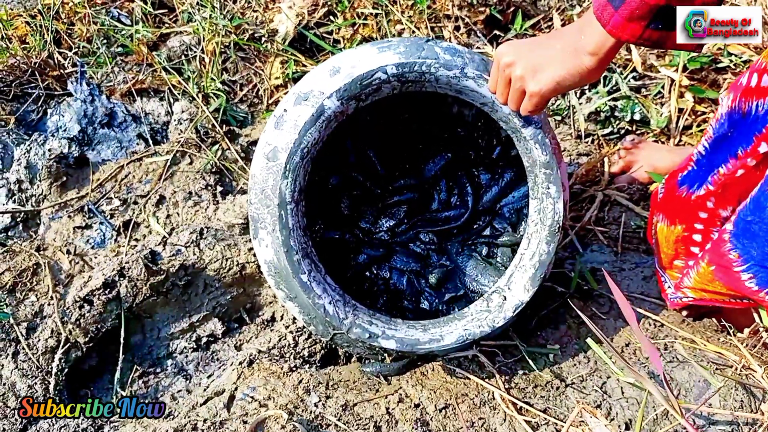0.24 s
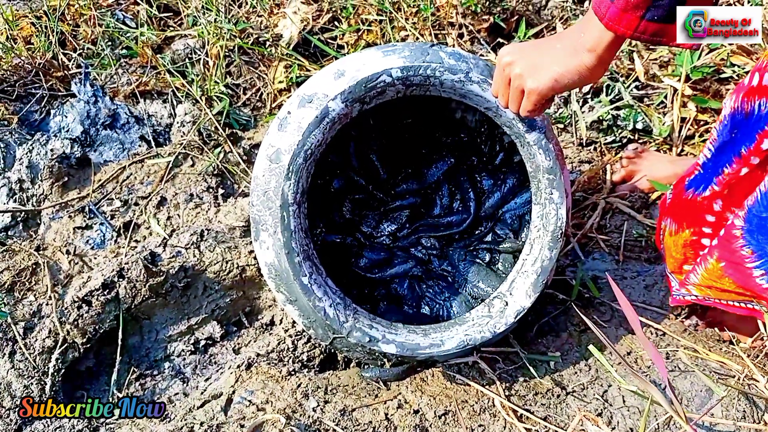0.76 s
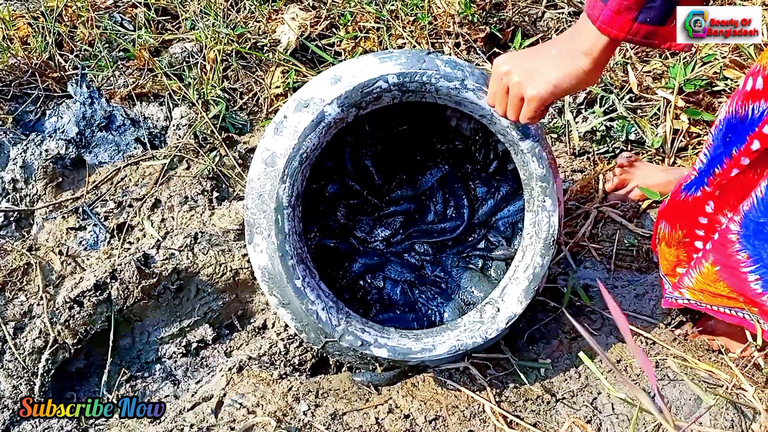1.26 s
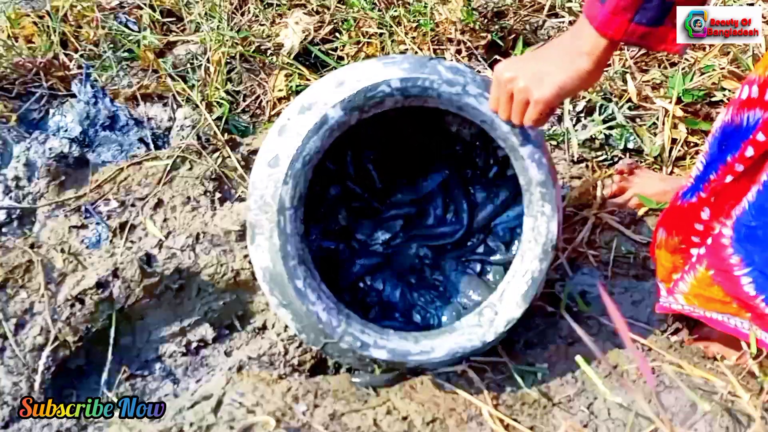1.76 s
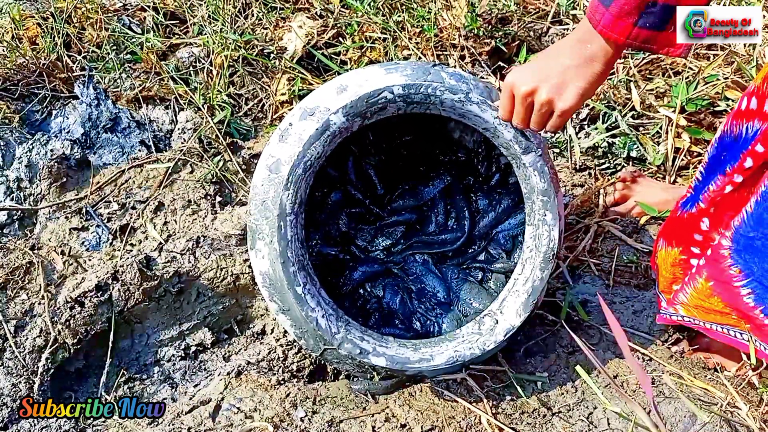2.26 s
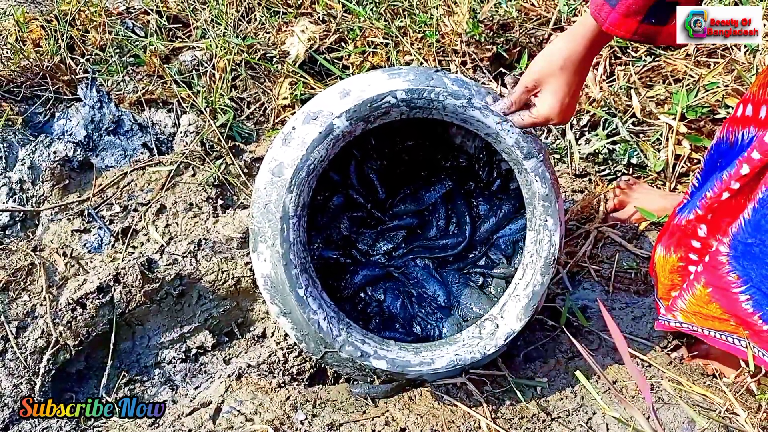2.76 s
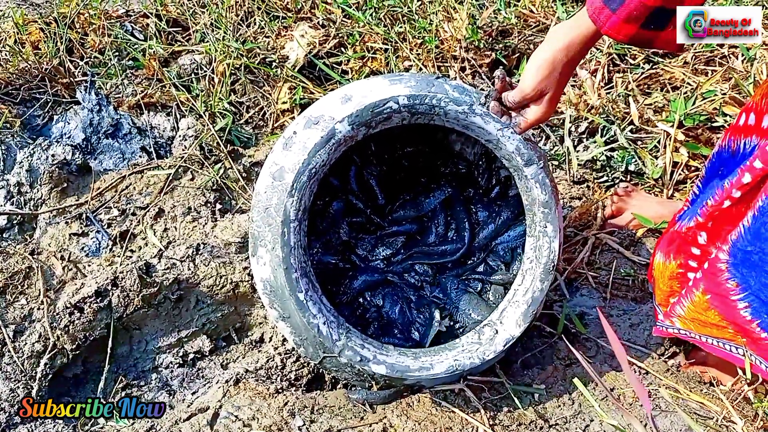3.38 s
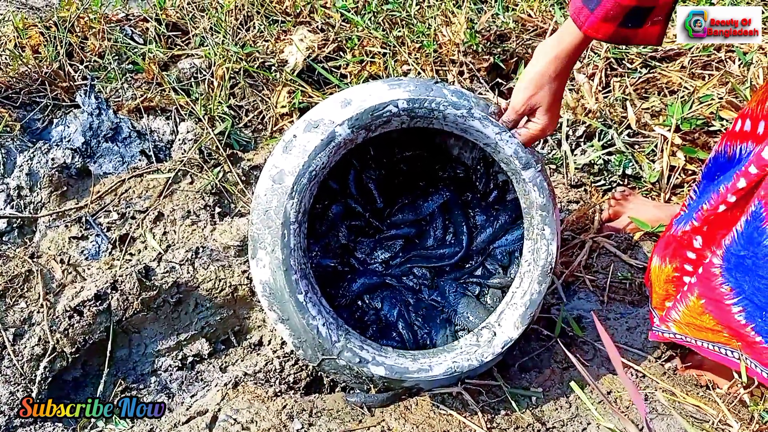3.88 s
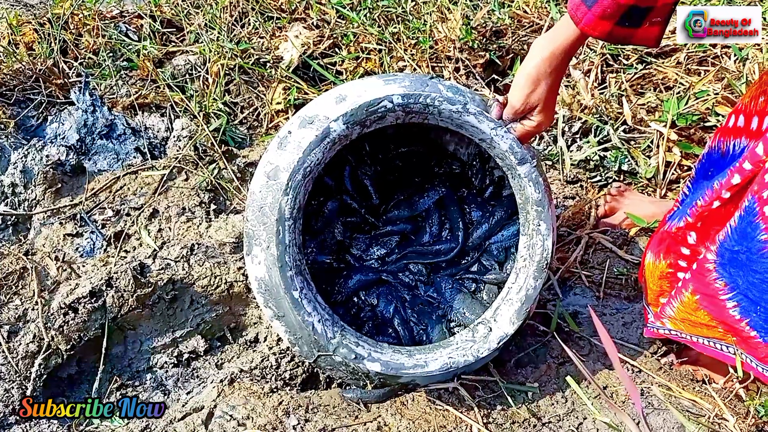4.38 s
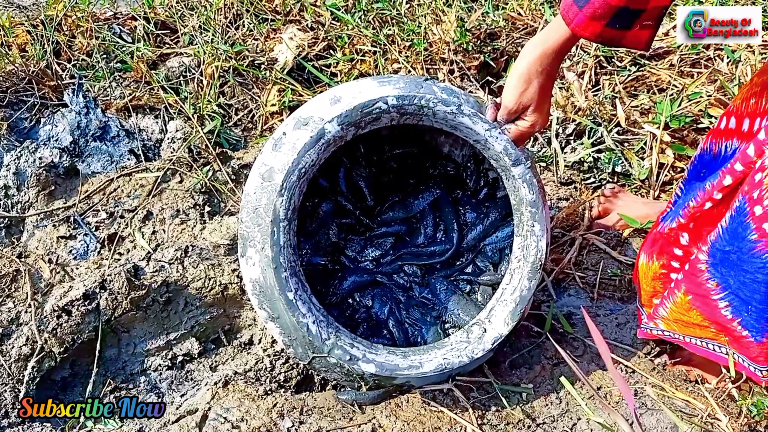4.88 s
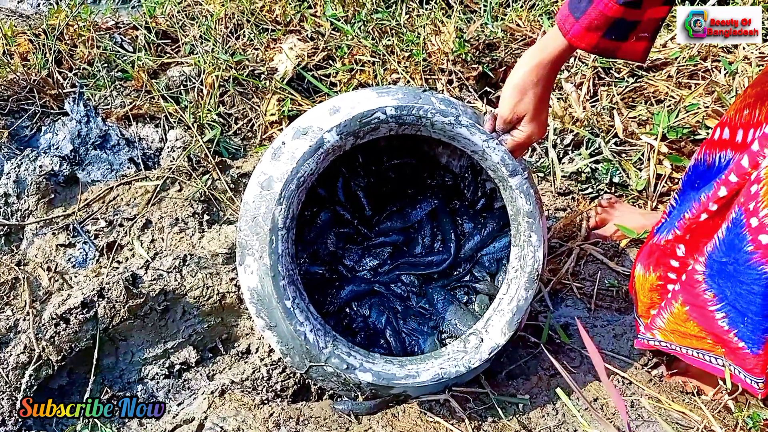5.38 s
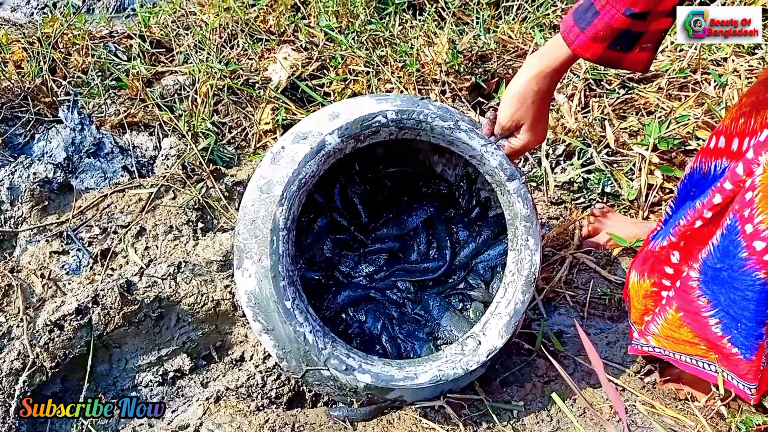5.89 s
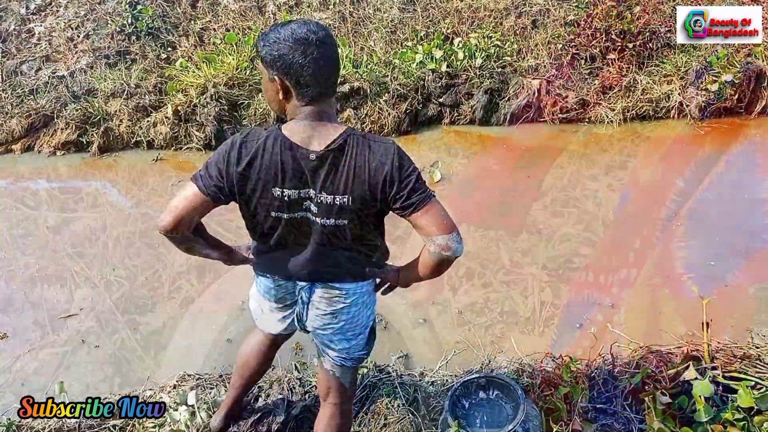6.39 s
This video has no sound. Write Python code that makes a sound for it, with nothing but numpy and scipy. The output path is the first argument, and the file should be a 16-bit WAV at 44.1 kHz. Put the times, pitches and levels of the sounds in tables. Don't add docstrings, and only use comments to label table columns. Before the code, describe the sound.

A single-cylinder engine thuds rapidly and evenly outdoors, steadily swelling closer, with small fish splashes early, belt puffs later, then a quick fade.

```python
import sys
import numpy as np
from scipy import signal
from scipy.fft import rfft, irfft, next_fast_len
from scipy.io import wavfile
from scipy.ndimage import uniform_filter1d, map_coordinates

SR = 44100
rng = np.random.default_rng(int(sys.argv[2]) if len(sys.argv) > 2 else 0)


def how_loud(loudness_db):
    steps = np.asarray(loudness_db, float) / 20
    return 10 ** steps


def transcribe(signal):
    frames = np.atleast_2d(signal).T
    limited = np.clip(frames, -1, 1)
    pcm = np.round(limited * 32767).astype(np.int16)
    wavfile.write(sys.argv[1], SR, pcm)


N = 292956

# time of an exhaust blast in seconds, firing number, valve lag in ms.
SHAFT = [(0.0542, 0, 22.0), (0.6122, 6, 22.6), (0.8887, 9, 22.5), (1.1603, 12, 22.1), (1.7044, 18, 20.8),
         (1.9894, 21, 23.2), (2.2789, 24, 23.6), (2.8538, 30, 23.4), (3.1373, 33, 23.1), (3.6987, 39, 22.9),
         (3.9749, 42, 22.5), (4.2476, 45, 22.1), (4.5252, 48, 22.8), (4.8078, 51, 23.7), (5.9449, 63, 25.6),
         (6.2261, 66, 25.7), (6.5035, 69, 25.9)]
# time in seconds, nearness in dB, engine load on the blast in dB,
# where the pipe mouth points (-1 away from the camera to 1 toward it).
APPROACH = [(0, 0.3, -0.5, -0.05), (.4, 0, 0, 0.37), (.9, 4, -4, 0.48), (1.3, 2.5, -0.5, 0.98),
            (1.7, 2, -4.5, -0.2), (2.1, 3, -3, -1.3), (2.5, 4.5, -1.7, -0.6), (2.9, 5.5, 1.5, -0.14),
            (3.4, 7.5, -0.3, 0.056), (3.9, 10, 1.6, 0.6), (4.2, 11, -1, 0.012), (4.7, 12.5, -1.4, -0.12),
            (5.1, 13.5, -3, -0.38), (5.5, 15, -1.8, 0.25), (5.8, 15, -1.9, 0.73), (6.05, 13.5, -2.5, 0.95),
            (6.3, 12.5, -2, 0.96)]


def unit(x):
    return x / np.sqrt(np.mean(x ** 2) + 1e-20)


def along(points, hz):
    f, v = np.transpose(points)
    return np.interp(np.log(hz + 1), np.log(f + 1), v)


def curves(rows, t):
    s, *cols = np.transpose(rows)
    return [np.interp(t, s, c) for c in cols]


def wobble(rate):
    knots = rng.standard_normal(int(N * rate / SR) + 4)
    return map_coordinates(knots, [np.arange(N) * rate / SR])


def past(t, start_s, db_per_s):
    return db_per_s * np.maximum(t - start_s, 0)


def filtered(x, response):
    m = next_fast_len(N + SR // 2)
    return irfft(rfft(x, m) * response(np.fft.rfftfreq(m, 1 / SR)), m)[..., :N]


def modes(table, soft_hz):
    def response(f):
        ring = sum(how_loud(db) * 1j * f * 50 / (c * c - f * f + 1j * f * w) for c, w, db in table)
        return ring * np.exp(-(f / soft_hz) ** 2)
    return response


def hiss(spectrum, lumps=1, patchy_db=2.0):
    # frequency in Hz, likeness of the left and right noise from 0 to 1.
    likeness = [(60, .98), (300, .95), (700, .8), (1400, .62), (3000, .55), (6000, .33), (15000, .2)]
    z = signal.stft(lumps * rng.standard_normal((2, N)), nperseg=512)[2]
    blotches = uniform_filter1d(rng.standard_normal(z.shape[1:]), size=3, axis=0)
    blotches = uniform_filter1d(blotches, size=4, axis=1)
    own, right = signal.istft(z * how_loud(patchy_db * unit(blotches)), nperseg=512)[1][:, :N]
    left = filtered(right, lambda hz: along(likeness, hz))
    left = left + filtered(own, lambda hz: np.sqrt(1 - along(likeness, hz) ** 2))
    return unit(filtered(np.array([left, right]), lambda hz: how_loud(along(spectrum, hz))))


def blows(s, db):
    at = np.round(s * SR).astype(int)
    return np.bincount(at[at < N], how_loud(db)[at < N], N)


def firing_count(t):
    s, number, _ = np.transpose(SHAFT)
    times = np.r_[2 * s[0] - s[1], s, 2 * s[-1] - s[-2]]
    numbers = np.r_[-number[1], number, 2 * number[-1] - number[-2]]
    return np.interp(t, times, numbers)


def rustle():
    # frequency in Hz, level in dB per Hz.
    leaves = [(7000, -64), (9500, -17), (11000, -9), (13000, 3), (14800, 12.5), (15500, 9.5), (15700, -120)]
    return how_loud(-77) * hiss(leaves, how_loud(1.5 * wobble(7)), patchy_db=2.5)


def pot():
    # start in seconds, peak level in dB, bubble pitch in Hz, length in ms.
    splashes = [(0.08, -28, 2680, 18), (0.141, -30.5, 2400, 11.5), (0.226, -28, 3070, 7.2),
                (0.725, -20, 1820, 5.9), (0.738, -32.5, 1600, 17), (.784, -30, 2300, 19),
                (0.829, -27, 1240, 8.2), (0.847, -28, 2480, 12), (.858, -20.5, 3100, 9.5),
                (0.89, -23, 2010, 9.5), (0.9, -19.5, 2580, 12), (1.024, -34, 1920, 15),
                (1.165, -23, 1837, 22.4), (1.552, -30, 2950, 9.5)]
    # peak time in seconds, peak level in dB.
    drops = [(0.1161, -56.5), (0.1815, -62.5), (0.38, -57.5), (0.4529, -54.5), (0.7806, -47.5),
             (0.8575, -54.5), (0.8904, -51.5), (1.0111, -66), (1.1707, -60), (2.3501, -69), (2.3685, -61),
             (2.6209, -72), (2.84, -65), (2.9677, -61.5), (4.2722, -64), (4.7263, -60), (4.8618, -58),
             (5.0424, -51), (5.3333, -53), (5.879, -57.5), (5.9728, -59), (6.1659, -62)]
    water, fizz = np.zeros(N + SR), np.zeros((2, N + SR))
    t = np.arange(SR // 16) / SR
    for s, db, hz, ms in splashes:
        u = t / (ms / 3000)
        swell = np.sqrt(u) * np.exp(.5 - 0.78 * u)
        pitch = hz * np.r_[1, np.exp(rng.normal(.3, .3, size=3))][:, None]
        bubbles = np.sin(2 * np.pi * pitch * t * (1 + 1.19 * t)) * how_loud([[0], [-3], [-5], [-7]])
        spray = 1.2 * ms / 10 * rng.standard_normal(len(t))
        water[round(s * SR):][:len(t)] += how_loud(db - 8.5) * swell * (bubbles.sum(0) + spray)
    for s, db in drops:
        swell = t / 0.017 * np.exp(1 - t / 0.014)
        drop = how_loud(db + 3.5) * swell * rng.standard_normal((2, len(t)))
        fizz[:, round((s - .008) * SR):][:, :len(t)] += drop
    body = filtered(water[:N], lambda hz: 1 / (1 + (900 / (hz + 1)) ** 4) / (1 + (hz / 6000) ** 7))
    near = np.array([how_loud(5.0) * body, how_loud(-1.0) * np.roll(body, shift=-3)])
    return near + how_loud([[-12], [.1]]) * filtered(fizz[:, :N], lambda hz: 1 / (1 + (10500 / (hz + 1)) ** 6))


def belt():
    # peak time in seconds, peak level in dB, ring pitch in Hz, level of the high rings in dB.
    slips = [(2.665, -19.5, 2390, -33), (2.8594, -24.5, 2690, -16), (2.9612, -26, 2280, -12),
             (3.0688, -25, 3060, -21), (3.26, -22.5, 2320, -19), (3.8613, -18, 3000, -31),
             (4.1361, -15.5, 2960, -30), (4.4712, -16, 2490, -16), (5.04, -15, 2400, -8),
             (5.188, -12.5, 3140, -36), (5.3883, -18.5, 3030, -4), (5.4874, -18.5, 2630, 2),
             (5.581, -17, 3040, -7), (5.683, -11.5, 2580, -6), (5.782, -9.5, 3100, -23),
             (5.877, -8, 3020, -28), (5.9746, -10.5, 3070, -9), (6.0724, -13.5, 2480, -15),
             (6.1652, -10, 2550, -16), (6.2608, -12, 2490, -18), (6.3573, -19.5, 2430, -1.5),
             (6.452, -19, 2700, -14), (6.545, -24.5, 3440, -16)]
    out, t = np.zeros((2, N + SR)), np.arange(SR // 16) / SR
    swell = (t / .011) ** 3 * np.exp(3 * (1 - t / .011))
    swell = swell + .5 * np.exp(-abs(t - .011) / .0018)
    f = np.fft.rfftfreq(len(t), 1 / SR)

    def peak(hz, width_hz):
        return 1 / (1 + ((f - hz) / width_hz) ** 2)

    for s, db, hz, top_db in slips:
        high = rng.uniform((4200, 6300), (5200, 7100))
        top = peak(high[0], 250) + peak(high[1], 200) + 0.096
        colour = peak(hz, 120) + 0.47 * peak(2700, 810) + how_loud(top_db + 2) * top
        band = (f < 7800) * (f > 1500)
        own, right = irfft(rfft(rng.standard_normal((2, len(t)))) * colour * band, len(t))
        air = unit(np.array([0.3 * right + 0.97 * own, right]))
        out[:, round((s - .009) * SR):][:, :len(t)] += how_loud(db - 9.5) * swell * air
    return out[:, :N]


def gears():
    teeth = 52.3
    t = np.arange(N) / SR
    turns = 2 * np.pi * uniform_filter1d(firing_count(t), size=6000)

    def load_db():
        return 2.85 * np.cos(turns - 1.9) + 3.0 * wobble(8)

    main = how_loud(load_db()) * np.sin(teeth * turns + .9 * wobble(18))
    pump = how_loud(load_db() - 8) * np.sin(1.19 * teeth * turns + 1.6 * wobble(35))
    near_db, _, turn = curves(APPROACH, t)
    return how_loud(-50.5 + 0.79 * near_db + 4.5 * turn) * (main + pump)


def clatter():
    # frequency in Hz, level in dB per Hz.
    housing = [(880, -23.5), (1500, -11.5), (2320, -2), (2830, -2), (3060, 1), (3820, -18), (4300, -20),
               (5590, -62.5), (9460, -120)]
    fins = [(2120, -19), (3600, 2.5), (3830, -1.5), (4460, -2.5), (4800, -3.5), (5450, -6.5), (6120, -5),
            (6670, -1), (6840, -6), (7920, -16.5), (9000, -31.5), (13100, -39), (14800, -71.5),
            (15500, -53.5)]
    frame = [(200, -120), (450, -16), (680, -3.5), (800, -0.5), (930, -6), (1150, -1), (1500, -8),
             (2200, -17.5), (4000, -120)]
    t = np.arange(N) / SR
    near_db = curves(APPROACH, t)[0]
    housing_db = -39 + near_db - past(t, start_s=5.74, db_per_s=13)
    fins_db = -44.5 + 0.87 * near_db - past(t, start_s=5.19, db_per_s=7)
    frame_db = -58.5 + 1.79 * near_db
    cycle_db = .9 * np.cos(2 * np.pi * (firing_count(t) - .3))
    ticks = how_loud(cycle_db + 1.3 * wobble(400) + .4 * wobble(40))

    def own(depth_db):
        return ticks * how_loud(depth_db * wobble(90) + 0.56 * wobble(8))

    sound = how_loud(housing_db) * hiss(housing, own(0.68))
    sound = sound + how_loud(fins_db) * hiss(fins, own(0.9))
    return sound + how_loud(frame_db) * hiss(frame, own(1.0))


def exhaust():
    # frequency in Hz, width in Hz, level in dB.
    upper_pipe = [(283, 56, -4.5), (410, 120, -12), (595, 210, -12.5)]
    lowest_pipe = [(161.6, 14.4, 1)]
    silencer = [(63.4, 12.8, -6.5), (106, 19.5, -6)]
    valve = [(105, 61, -7.5), (206, 43, -1.5), (313, 85, -3.5), (464, 660, -9)]
    # frequency in Hz, level in dB per Hz.
    rumble = [(18, -27), (30, -26), (59, -19), (113, -9.5), (167, -7), (255, -9), (316, -9), (412, -10.5),
              (545, -16.5), (614, -16.5), (720, -27), (940, -49), (1580, -120)]
    t = np.arange(N) / SR
    count = firing_count(t)
    start = np.interp(np.arange(int(count[-1]) + 1), count, t)
    lag = curves(SHAFT, start)[1] / 1000
    near_db, load_db, turn = curves(APPROACH, start)
    luck = rng.standard_normal((len(start), 5))

    blast_db = -31.5 + near_db + load_db
    bark = blows(start, blast_db + 10 * turn + 0.4 * luck[:, 0] + 43.5)
    pipe = filtered(bark, modes(upper_pipe, soft_hz=715))
    tone = blows(start, blast_db - 3.5 * turn + 45.5)
    pipe = pipe + filtered(tone, modes(lowest_pipe, soft_hz=750))
    shell = blows(start + 0.00096, blast_db + 2.5 * turn + 1.5 * luck[:, 4] + 48)
    drum = filtered(shell, modes(silencer, soft_hz=320))

    pop_db = -22.5 + 0.63 * near_db + 3.5 * turn - past(start, start_s=4.1, db_per_s=4)
    pops = blows(start + lag, pop_db + .8 * luck[:, 1])
    pops = pops + blows(start + lag + .0118, pop_db - 12 + 1.5 * luck[:, 2])
    pops = pops + blows(start + 2.1 * lag, pop_db - 10.0 + 0.83 * luck[:, 3])
    pop = how_loud(42.5) * filtered(pops, modes(valve, soft_hz=570))

    around_db, _, facing = curves(APPROACH, t)
    surge = how_loud(2.5 * np.cos(2 * np.pi * (count - .25)) + 1.2 * wobble(30))
    rumble_db = -44.5 + 1.104 * around_db + 0.9 * facing
    turbulence = how_loud(rumble_db) * hiss(rumble, surge, patchy_db=1.5)
    return pipe - drum + pop + turbulence


def ports(pair):
    # frequency in Hz, left level over right in dB.
    shade = [(60, 0.0), (110, 0.0), (200, 0.5), (380, 0.5), (700, -1.5), (1290, -6.0), (2380, -13.0),
             (4400, -10.5), (8120, -10.0), (15000, -11.0)]
    lag_s = 20 / SR

    def response(hz):
        lead = 2 * np.pi * hz * lag_s - 2.2 * hz * 1200 / (1200 ** 2 + hz ** 2)
        level_db = np.array([along(shade, hz), 0 * hz])
        return how_loud(level_db) * np.exp(.5j * lead * np.array([[1], [-1]]))

    return filtered(pair, response)


def scene():
    fade_s, fade_end_s = 6.37, 6.758
    fade = np.clip((fade_end_s - np.arange(N) / SR) / (fade_end_s - fade_s), 0, 1)
    engine = fade * (exhaust() + gears() + clatter())
    return ports(engine + belt() + rustle()) + pot()


def top_cut(x):
    return signal.sosfilt(signal.butter(12, 16040, fs=SR, output="sos"), x)


def record(dry):
    # frequency in Hz, level in dB under which the camera keeps nothing.
    hearing = [(7000, -110), (7900, -92), (9000, -103.5), (10200, -107.5), (11000, -108), (15500, -108)]
    heard = filtered(dry, lambda f: (f < 15400) / (1 + (46 / (f + 1)) ** 3))
    hz, _, z = signal.stft(heard, SR, nperseg=2048)
    power = uniform_filter1d(abs(z) ** 2, size=5, axis=1)
    around = uniform_filter1d(uniform_filter1d(power, size=9, axis=1), size=9, axis=2)
    audible = power > how_loud(2 * along(hearing, hz))[:, None]
    unmasked = power > 1.05 * around
    kept = audible & unmasked | (hz[:, None] < 7600)
    mix = signal.istft(z * kept, SR, nperseg=2048)[1][:, :N]
    return top_cut(mix)


dry = scene()
out = record(dry)
transcribe(out)
```